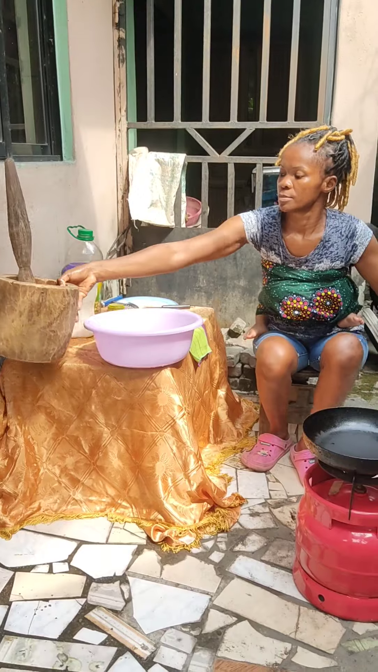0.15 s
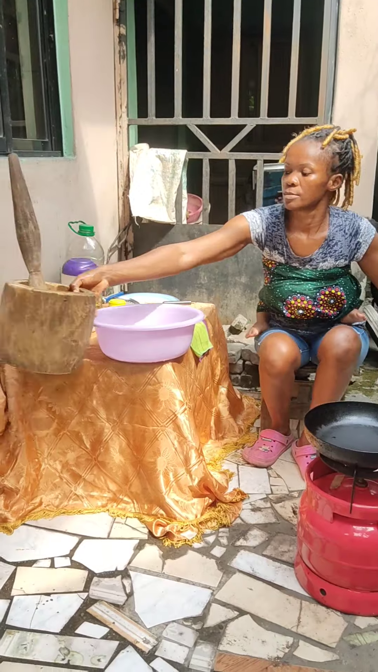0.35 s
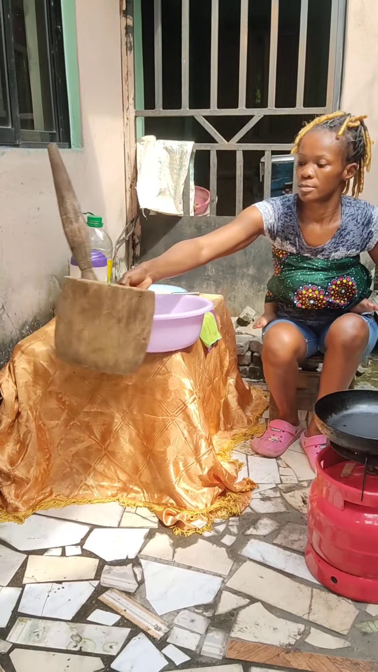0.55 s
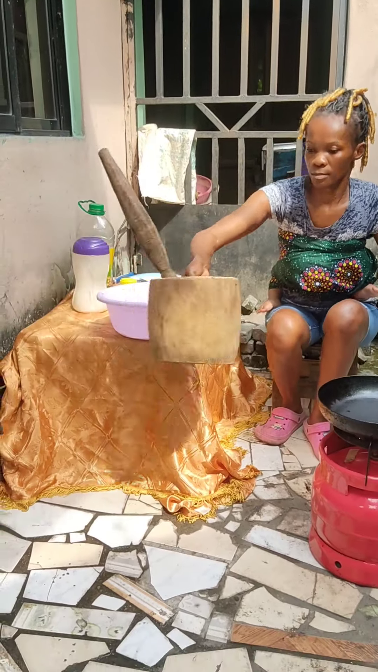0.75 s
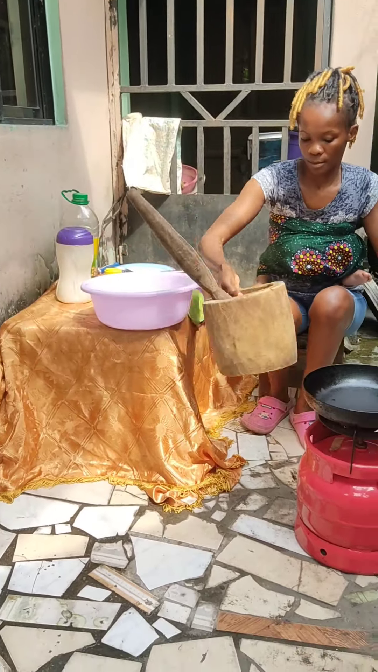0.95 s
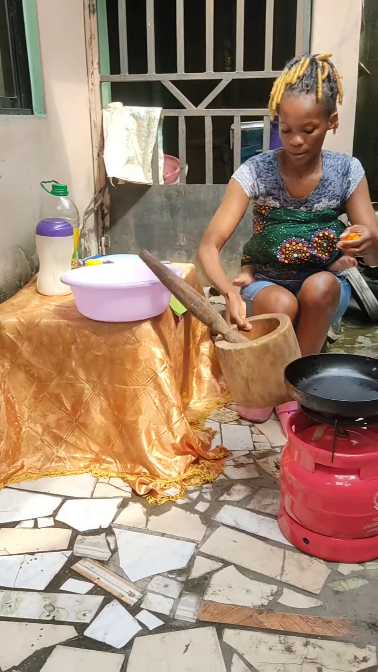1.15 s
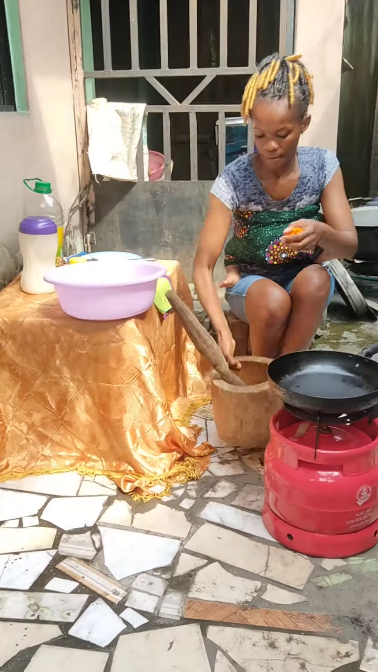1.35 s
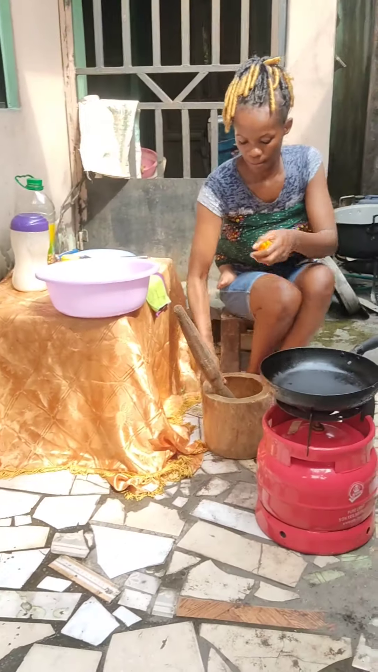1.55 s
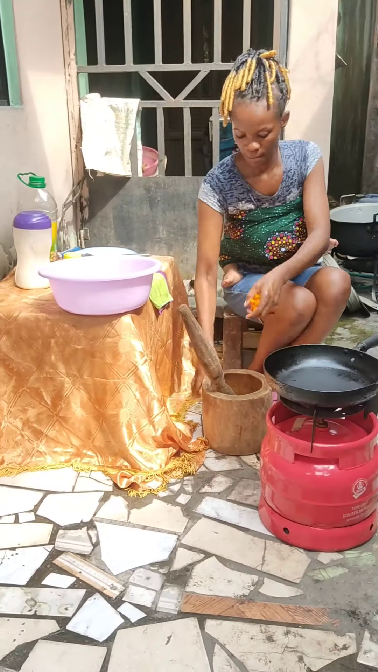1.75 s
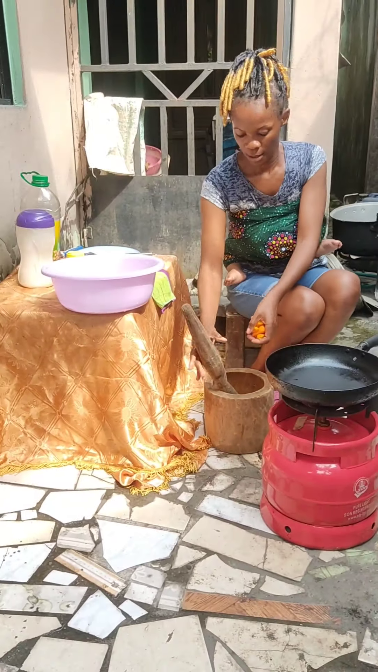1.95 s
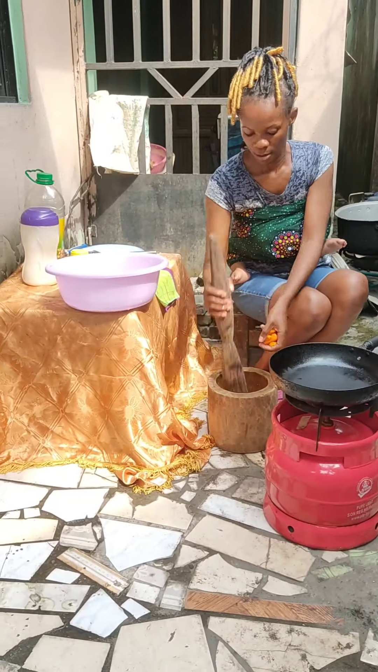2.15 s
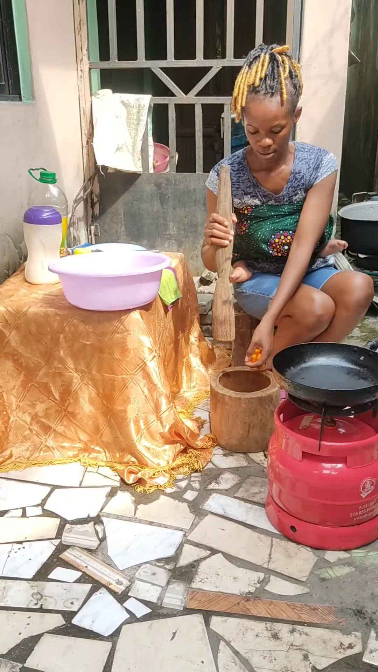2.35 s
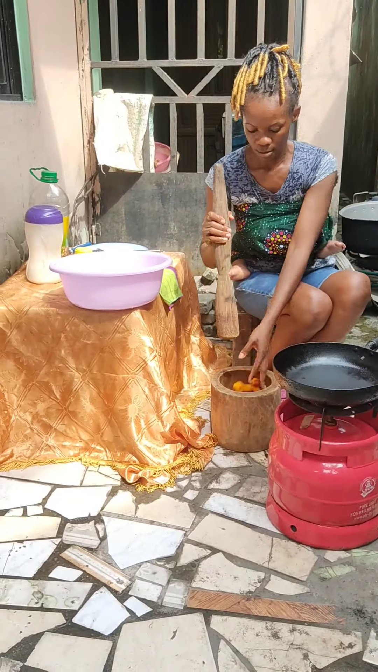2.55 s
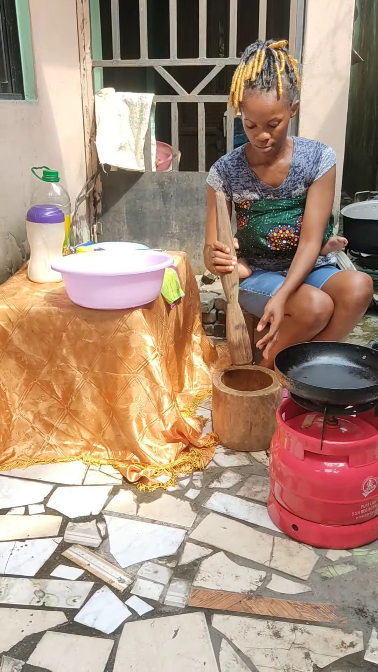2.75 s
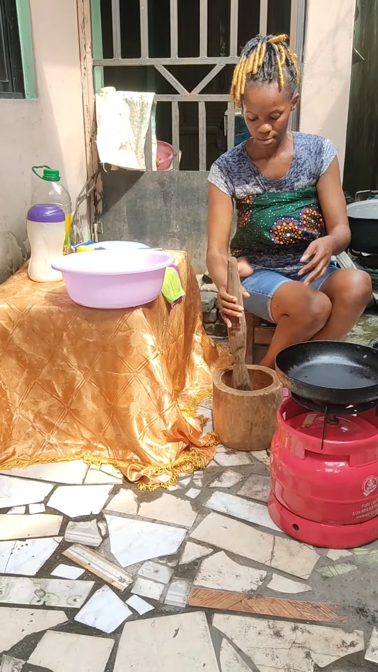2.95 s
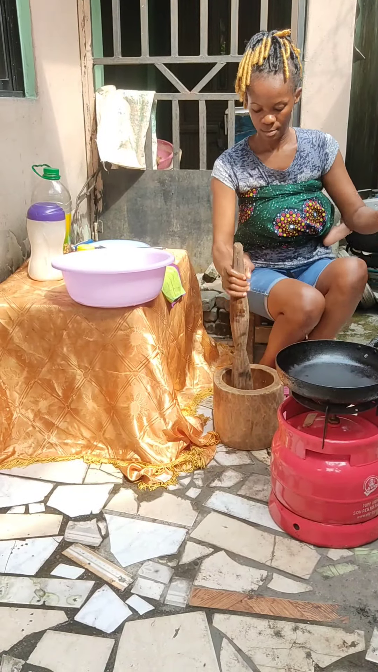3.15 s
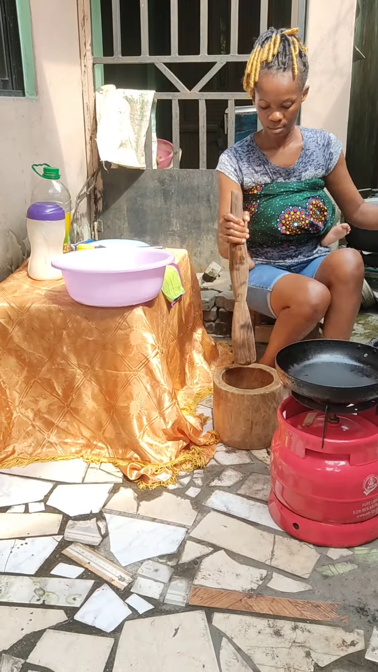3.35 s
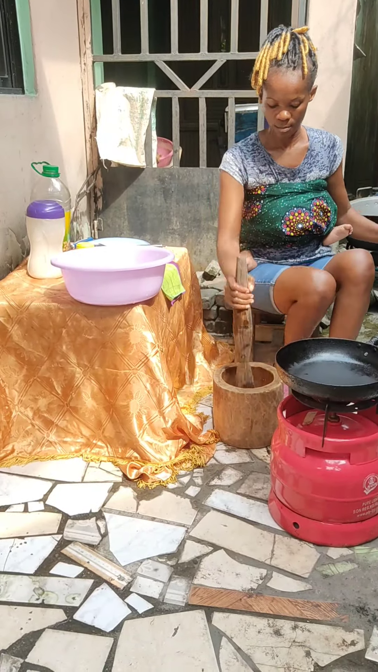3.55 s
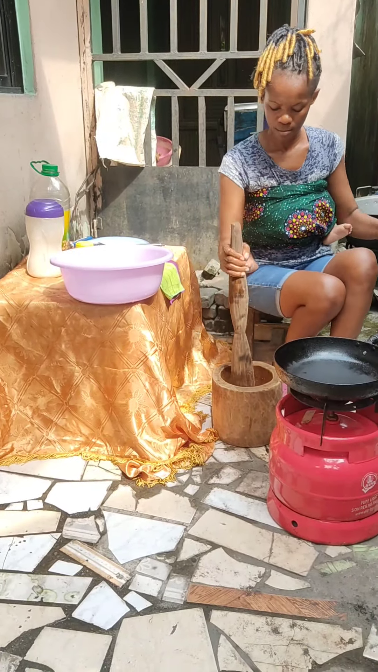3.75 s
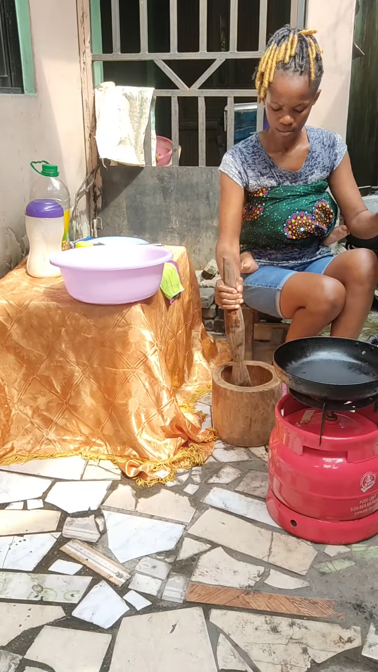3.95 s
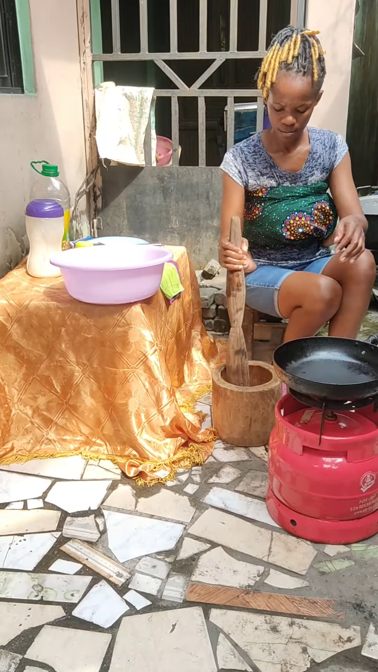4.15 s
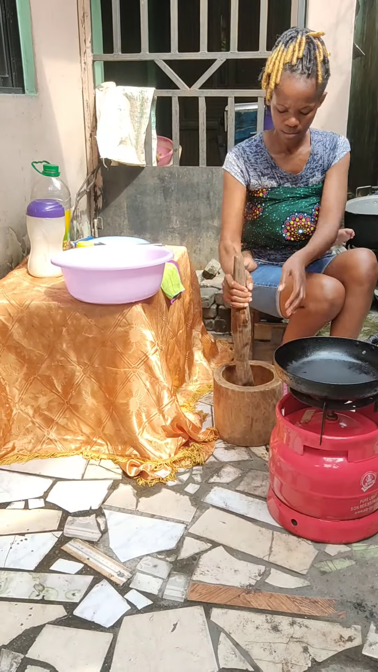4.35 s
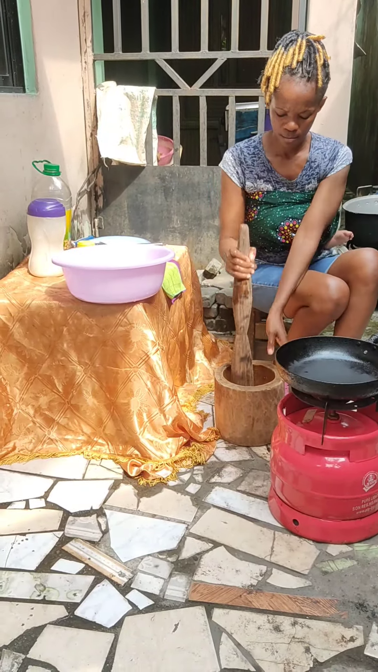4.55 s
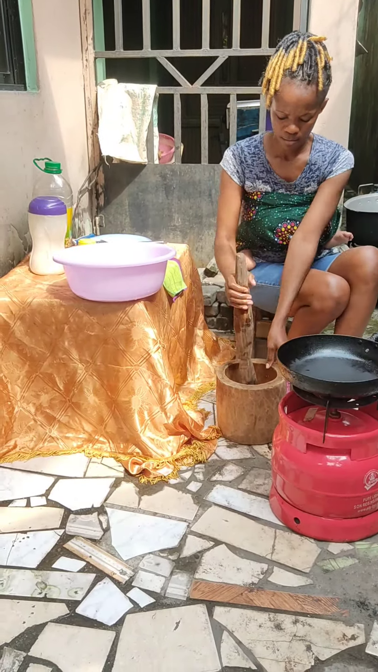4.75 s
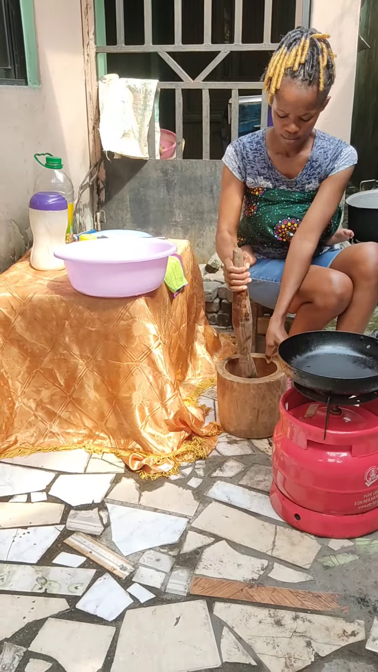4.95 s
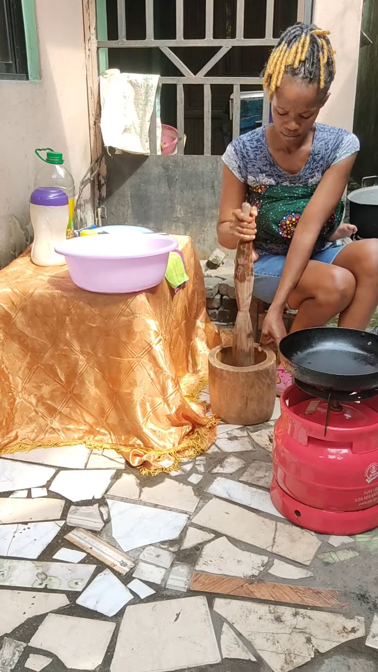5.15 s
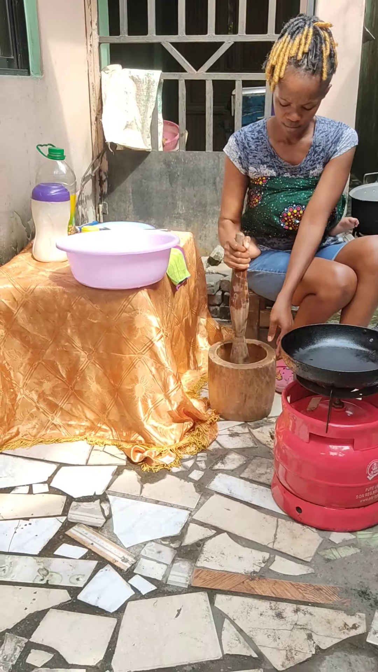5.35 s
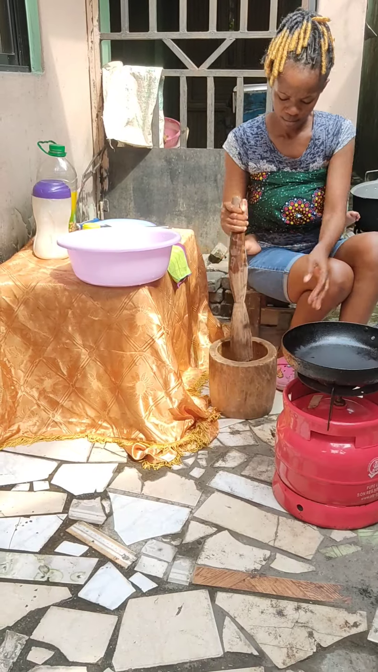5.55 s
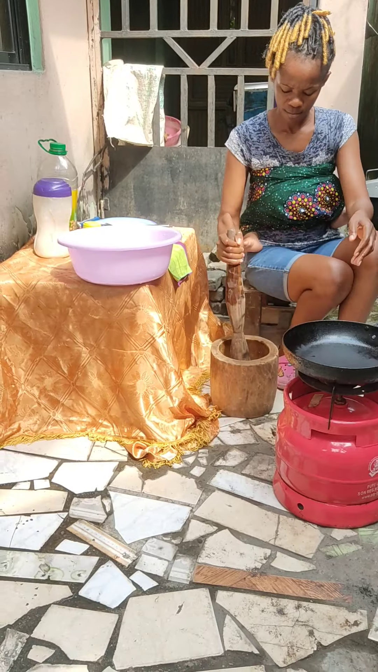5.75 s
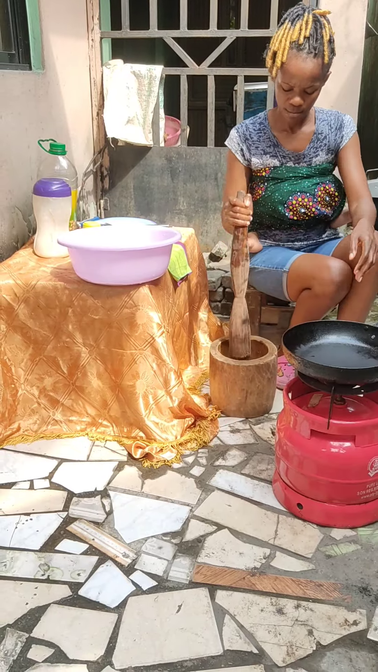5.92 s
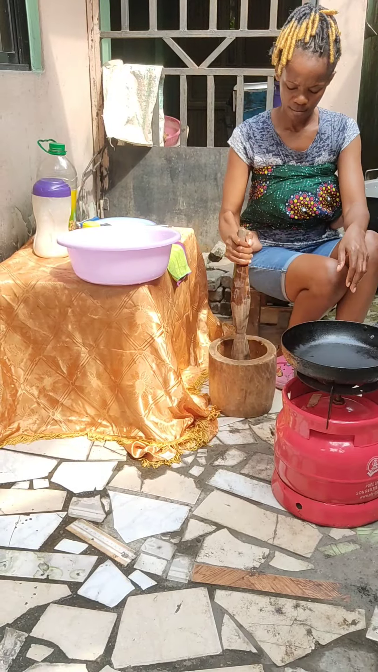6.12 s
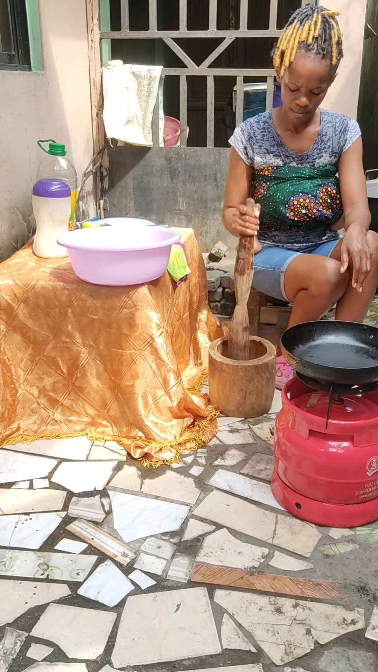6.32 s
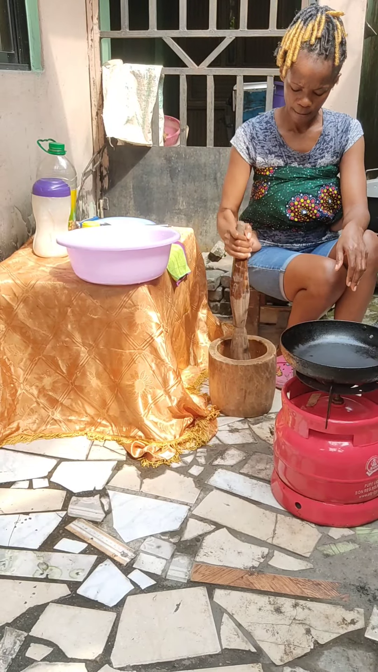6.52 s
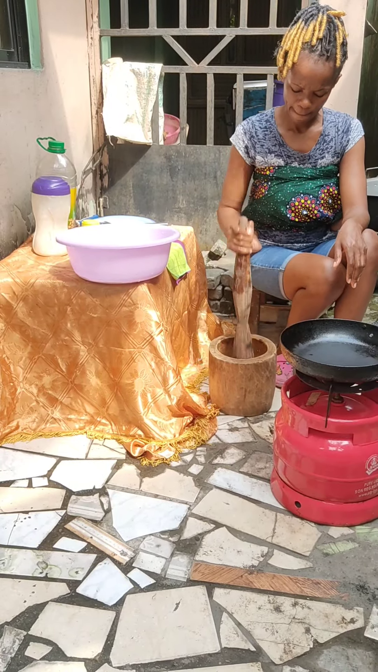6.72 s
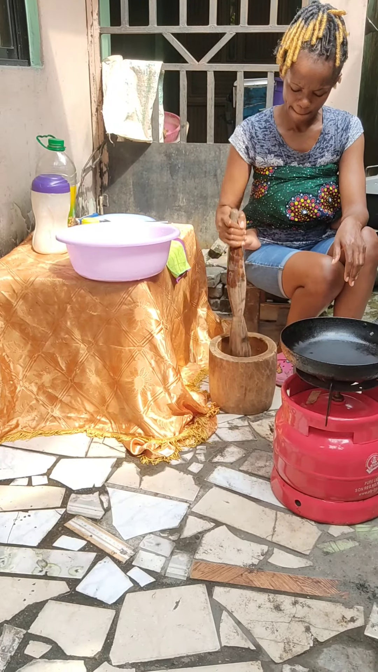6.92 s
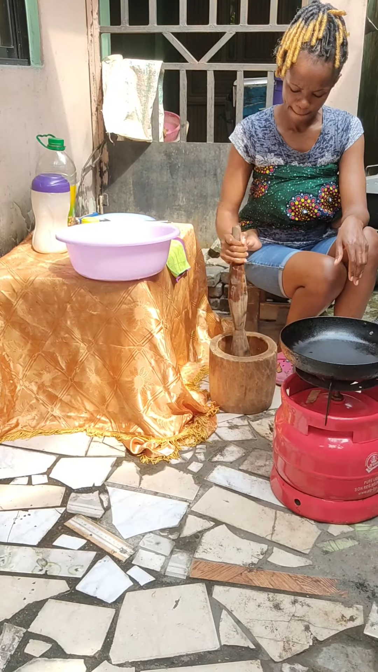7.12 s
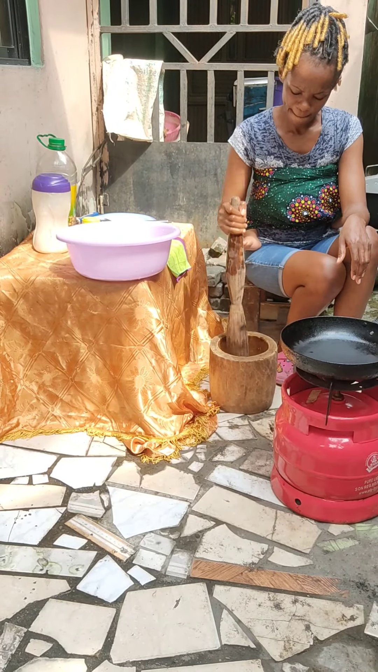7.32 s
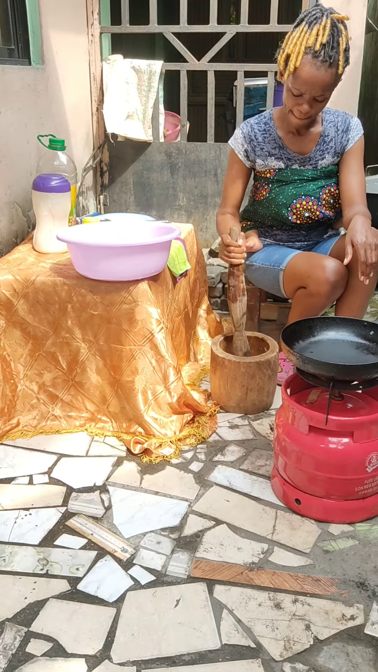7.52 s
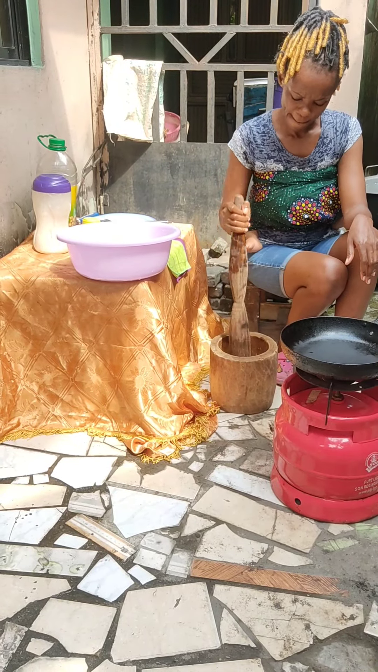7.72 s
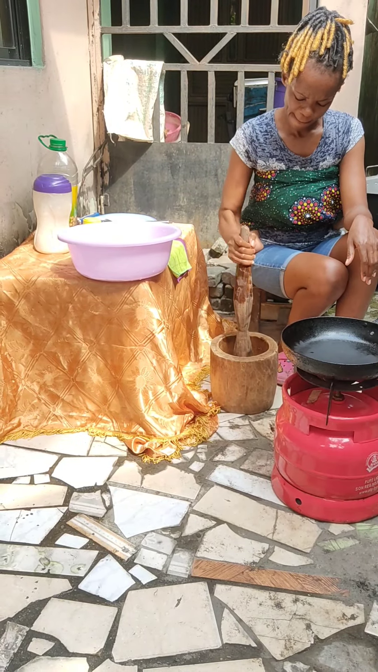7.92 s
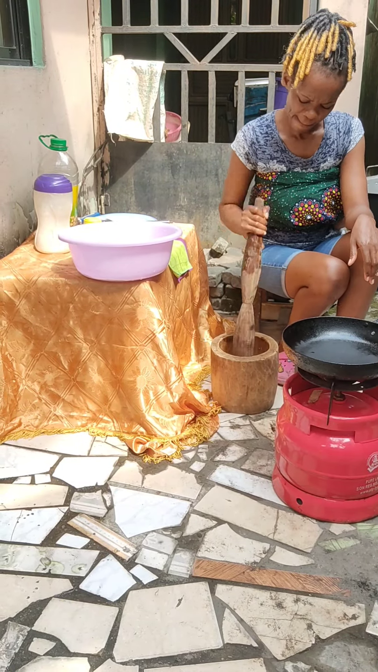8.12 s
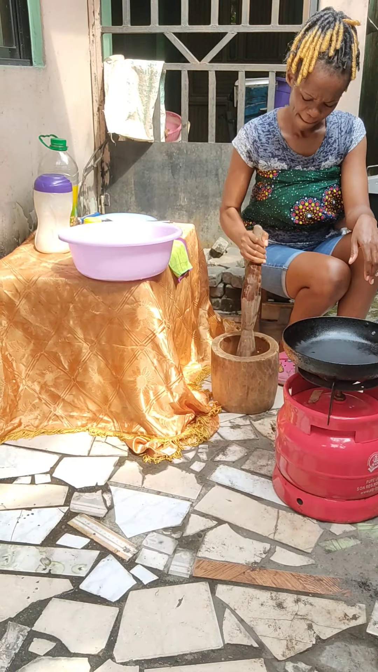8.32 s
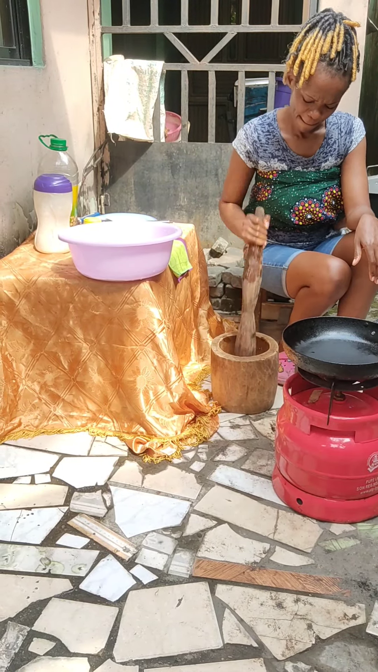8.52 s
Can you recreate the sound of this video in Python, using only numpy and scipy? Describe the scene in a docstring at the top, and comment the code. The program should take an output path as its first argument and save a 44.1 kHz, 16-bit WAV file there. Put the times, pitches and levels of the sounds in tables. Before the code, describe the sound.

A stereo outdoor take from a short distance: quiet breeze rumble and far noise, soft shuffling and dry ticks, then a solid wooden knock as the mortar is set down. Sparse soft taps and a rustle lead into regular pestle blows, deep and woody, each with a brief gritty squash of peppers. Some ring more hollowly, others are duller. Close hard walls add a short, tight echo; the pounding never stops.

```python
"""A breeze rumbles throughout on two microphone ports over far outdoor noise, with rustling cloth and feet,
while a pestle pounds peppers in a wooden mortar on the paving of a walled yard.
Each blow is a jittery force that rings the mortar's modes, plus a crunch of random clicks from the peppers.
Rustles are dense friction clicks, ticks are short resonant bursts, and three faint chirps glide upward.
Delays and fading noise echoes place all but the wind and far noise in the yard."""
import sys
import numpy as np
from scipy import signal
from scipy.fft import rfft, irfft, next_fast_len
from scipy.io import wavfile
from scipy.ndimage import uniform_filter1d

SR = 44100
rng = np.random.default_rng(int(sys.argv[2]) if len(sys.argv) > 2 else 0)


def inscribe(sig):
    """Save sig as 16-bit PCM at rate SR to the path in sys.argv[1].

    A 1-D sig is mono; a 2-D sig holds one channel per row.
    Samples are clipped to [-1, 1] before scaling.
    """
    pcm = np.round(np.clip(np.atleast_2d(sig).T, -1, 1) * 32767)
    wavfile.write(sys.argv[1], SR, pcm.astype(np.int16))


N = 378378  # length of the scene [samples]

# In all tables t60 is the time to fade by 60 dB. Levels are those of each layer before later stages.
# Wind strength over time: (time [s], level [dB])
WIND_LEVEL = [(0.0, -64), (0.33, -56), (0.5, -50.5), (0.95, -58.5), (1.46, -56), (1.98, -46.5), (2.24, -59),
              (3.15, -65), (3.34, -68), (3.61, -56.5), (4.11, -56), (4.42, -46.5), (5.14, -47),
              (5.54, -51.5), (5.78, -52.5), (6.57, -48), (6.81, -48.5), (7.53, -48.5), (7.84, -50.5),
              (8.58, -44)]
# Tone of the wind: (frequency [Hz], level [dB per Hz])
WIND_TONE = [(15, -2.5), (30, 1), (45, -12.5), (65, -12), (100, -26), (160, -19), (400, -63)]
# Tone of the far outdoor noise: (frequency [Hz], level [dB per Hz])
FAR_TONE = [(35, -3.5), (60, 5), (90, -5), (125, -14), (196, -3.5), (400, -7.5), (953, -18.5), (1600, -25),
            (2780, -23.5), (3760, -31.5), (6000, -29.5), (15500, -44.5)]
# How alike left and right are in diffuse sound: (frequency [Hz], likeness [-1 to 1])
STEREO_LIKENESS = [(30, .95), (130, .97), (200, .9), (290, .2), (640, -.2), (1400, .1), (4000, 0)]
# Faint far chirps, perhaps a bird: (time of loudest point [s], level [dB])
CHIRP_TIMES = [(6.11, -55), (6.183, -56), (6.26, -58)]
# Movements of cloth, feet and hands; swells and fades under 5 ms count as 5 ms:
# (time of loudest point [s], level [dB], swell by 20 dB [s], fade by 20 dB [s], dull share [0 to 1])
MOVEMENTS = [(.01, -51, 13, -1.1, .3), (0.32, -52.5, -0.18, 0.22, 0.06), (.41, -50, 0.54, 0.26, 0.34),
             (.749, -53, 0.3, 0.58, 0.95), (.914, -53, 0.12, 0, 0.11), (1.025, -47.5, 0.14, 0.05, 0.05),
             (1.2, -47, 0.1, 0.04, 0.09), (1.299, -52.5, .37, .5, 0.14), (1.428, -47, 0.1, 0.14, 0.74),
             (1.598, -46, -0.05, 0.15, 0.46), (1.66, -54.5, 0.07, 0.32, .6), (1.9, -55, -0.7, 0.1, 0.27),
             (2.135, -63, 0.17, 0.3, 0.93), (2.53, -55, 0.14, 0.4, 0.8), (2.7, -58, -0.03, 0, 0.5),
             (3.026, -53, 0.3, -0.02, 0.14), (3.095, -43, 0.16, 0.09, 0.03), (3.226, -44.5, 0.03, 0.29, 0),
             (3.257, -46, 0.07, 0.28, 0.4), (3.3, -64, 0.4, 1.3, 1), (4.92, -57.5, 1, 0.2, 0.37),
             (5.025, -46, 0.2, .2, 0.36), (5.085, -51, 0.16, 0.33, 0.6), (7.345, -57, 0.07, -0.4, 0.04)]
# Tone of the friction: (frequency [Hz], level [dB per Hz])
FRICTION_TONE = [(200, -30), (400, -10.5), (700, -7.5), (1000, -4), (1600, -7.5), (2200, -6.5), (3500, -7),
                 (6000, -4.5), (15500, -7)]
# Small dry ticks and scuffs: (time [s], level of the loudest 12 ms [dB], pitch [Hz], burst t60 [s])
TICK_EVENTS = [(0.225, -56, 8000, 0.027), (0.6674, -41.5, 8800, 0.04), (0.732, -47.5, 2700, 0.19),
               (1.4372, -31.5, 3620, 0.017), (1.439, -43, 5030, 0.048), (1.601, -45, 8900, 0.03),
               (1.765, -50.5, 8200, 0.024), (2.05, -49, 990, 0.03), (2.075, -58, 1800, 0.02),
               (2.114, -51, 1480, 0.03), (2.294, -54, 2600, 0.017), (3.442, -67, 1900, 0.025)]
# Contacts with the mortar; out-of-range crunch settings are limited in crunch_envelope():
# (time [s], paving boom [dB], ground thud [dB], lower wall ring [dB], upper wall ring [dB], rim ring [dB],
#  lower wall detuning [%], dead knock over ring [dB], judder [s], crunch [dB], crunch peak after contact [s],
#  crunch swell by 20 dB [s], crunch t60 [s], crunch tilt [dB per octave], lead hiss relative to crunch [dB],
#  left over right [dB])
CONTACTS = [(0.992, -82, -63, -68, -68, -45.5, 1.5, 17, 0.021, -50.5, 0.033, 1, .16, 0, -20, -1),
            (1.411, -62, -57, -51, -52, -41, -2, 8, 0.0026, -48, 0.0034, .01, .1, 1, -20, -2),
            (1.440, -34, -21, -17, -14, -16, 0.5, 3, 0.0043, -30.5, .002, -2.3, .04, -6, -12.5, -2.5),
            (1.511, -62, -35.5, -50, -38, -55, -1, -5, 0.0064, -68, 0.028, -0.5, .09, 0, -20, -1),
            (1.938, -52, -40.5, -44.5, -56, -54, -4.5, -2, 0.0046, -66, .004, 7, .1, 0, -20, 1.5),
            (2.497, -52, -50.5, -38.5, -46, -43, -2, -2, .022, -56, 0.035, -2, 0.13, -7, -16, 3),
            (2.869, -36, -29, -36.5, -48, -47, -0.5, 2.5, 0.011, -32.5, 0.0077, 1, 0.12, 1, -37, 0.5),
            (3.299, -65, -48, -52, -55, -48.5, -2, 10, .0058, -54, 0.0023, 2, .1, -11.5, -20, 2),
            (3.436, -69.5, -82, -59, -65, -37, 0, 2, 0.0099, -43, 0.011, 2, 0.28, -4.5, -30, -2),
            (3.466, -29.5, -29, -32.5, -28, -42, 0, 5.5, 0.011, -22.5, 0.01, 0.6, 0.17, -3, -30, 0.5),
            (3.846, -32, -16.5, -20, -20.5, -24.5, -1, 1.5, 0.0076, -24.5, 0.0049, 0.7, 0.13, -3.5, -27, 0.5),
            (4.204, -28, -17, -17.5, -18.5, -23, 0, 1, 0.0069, -23, 0.0057, -0.2, 0.13, -4, -14, 0),
            (4.545, -47.5, -32, -29, -36, -48, 7, -2, 0.0021, -47.5, 0, -2, .08, -6, -15, 0),
            (4.557, -39, -21, -15, -13.5, -18, 0.5, -1, 0.0084, -18, 0.0087, 0.7, 0.088, -5, -26, -4.5),
            (4.644, -54, -39, -38, -30.5, -52, -1.5, -12, 0.0071, -50, .005, 7, .1, -5, -20, -1),
            (4.996, -54, -37, -40.5, -64, -45.5, -0.5, -2, 0.007, -51.5, 0, -2, .1, -6, -20, 0),
            (5.08, -48, -32, -38, -51, -44, -5.5, 4, 0.0062, -62, .005, .01, .1, -8, -20.5, 0),
            (5.215, -33, -16, -19, -20.5, -29.5, -1.5, 1.5, 0.0096, -19, 0.018, -3, 0.082, -2.5, -16, 0.5),
            (5.584, -30, -18.5, -17.5, -21.5, -26.5, -5, 0, 0.0084, -42, 0.0029, -0.2, 0.17, -4.5, -20, 0),
            (5.610, -31, -15, -24.5, -40, -22.5, 0, 2, 0.0051, -22, 0, 0.5, 0.066, -3, -21, 0.5),
            (5.957, -26.5, -21, -44, -42, -42, 1.5, 1, 0.0056, -23, 0.0034, .016, 0.051, -1, -15, 0),
            (6.308, -29, -18, -12, -13, -18.5, 0.5, -3, 0.013, -24.5, 0.015, -0.3, 0.054, 0.5, -27, -4.5),
            (6.679, -23.5, -17.5, -34.5, -44, -41, 0, 3.5, 0.0038, -24.5, 0.0014, 0.1, 0.076, -1, -32, 0),
            (7.033, -25, -20.5, -31, -35, -46, 0.5, 3, 0.0078, -17.5, 0.0063, 0.2, 0.051, -1.5, -13.5, -0.5),
            (7.402, -25.5, -15, -17, -20.5, -30.5, -0.5, 5.5, 0.0086, -24.5, 0.0093, 0.1, 0.067, 0.5, -12, 0),
            (7.751, -23, -15.5, -15.5, -27.5, -26.5, -4.5, 2, .006, -23, 0.0086, 3.5, .11, -2, -14.5, 0.5),
            (8.110, -28, -16, -11, -11, -27.5, 0, -0.5, 0.0057, -30, 0.0065, -0.15, 0.12, -2.5, -28, -4),
            (8.165, -39.5, -24.5, -29, -35.5, -59, -0.5, -10, 0.004, -51, 0, .01, .1, -1, -20, -3.5),
            (8.475, -27.5, -16, -13.5, -15, -25, -2, 3, 0.009, -26.5, .009, -4, 0.11, -1.5, -14, -3)]
# Tone of the crunch before each contact's tilt: (frequency [Hz], level [dB per Hz])
CRUNCH_TONE = [(400, -8.5), (800, -11), (1500, -4), (2100, -6), (2800, -0.5), (3500, -6), (6000, -3.5),
               (10000, -6), (15500, -7)]
# Ringing modes of the mortar on the paving: (frequency [Hz], level within its zone [dB], t60 [s])
MORTAR_MODES = [(71.6, 4, 0.34), (107.9, 0.5, 0.23), (163.6, -7.5, 0.23), (186.4, -10, 0.14),
                (204.3, 5.5, .17), (240, -2, 0.14), (279, -1.5, .14), (311.3, 3.5, 0.16), (373.5, -9, 0.31),
                (429.5, -8, 0.1), (478, -3, 0.087), (507.5, 6, 0.17), (546.7, 4, .13), (607, -0.5, .12),
                (652, -9, 0.13), (764, 1, .057), (957, 6, 0.088), (987, -9, 0.14), (933, 9.5, .036),
                (1316, -1.5, 0.069), (1500, -9.5, 0.046), (1948, -10.5, 0.046)]
# Upper ends of the boom, thud, lower wall, upper wall and rim zones: (frequency [Hz])
ZONE_TOPS = [130, 340, 528, 720, 2400]
# Echoes off the near walls and paving: (frequency [Hz], t60 [s], level [dB])
YARD_ECHOES = [(60, .25, -6), (250, .24, -1), (1000, .22, -1), (4000, .17, -1), (12000, .13, -1)]
# Delay of direct sound at the left port, as bass bends round the body: (frequency [Hz], delay [s])
LEFT_DELAY = [(300, 0.00016), (550, 0.00025), (1000, 0.000064), (1700, 0.00045), (9000, 0.0003897)]
# The microphones' body shades one port: (frequency [Hz], left over right [dB])
BODY_SHADOW = [(60, 5.5), (150, 4.5), (380, 10.5), (700, 0.5), (1290, 6), (2380, 3), (4400, 0),
               (8120, -3.5), (15000, 4)]
# Port resonance and roll-off: (frequency [Hz], level [dB])
PORT_TONE = [(5500, 3), (7000, 5), (8100, 11.5), (9300, 10), (10400, -5), (12500, -6.5), (15500, -31)]

FAR_DB = -56.5
CHIRP_HZ, CHIRP_RISE_HZ_PER_S = 2830, 2500  # pitch at the loudest point, and its rise
CHIRP_FADE_S = 0.067  # to swell or fade by 20 dB
DULL_HZ = 3130  # heavy rubbing stays mostly below this
MODE_SCATTER_DB, MODE_SHIFT = 3, 0.015  # chance spread at each contact [dB, share of pitch]
ROCK_DB, ROCK_T60_S = -13, 0.39  # the mortar rocks after the blow and keeps feeding its modes
LEAD_S = 0.03  # a faint hiss leads each crunch by up to this long
SLOWEST_SWELL_S = .022  # longest allowed crunch swell by 20 dB
BURST_DB, BURST_S = -4.5, 0.0058  # skins burst together at the peak of the crunch
CRUNCH_LUMPS_DB = 2.0  # peppers burst unevenly
WOOD_DIRECT_DB, WOOD_ECHO_DB = -3.5, -3  # knocks carry mostly straight
GRIT_DIRECT_DB, GRIT_ECHO_DB = -5.5, 0.74  # crunch, ticks, rustle and chirps scatter more
FIRST_ECHO_S = 0.0012  # echoes start here and are fully in at twice this
FAR_WALLS_DB, FAR_WALLS_LONGER = -15, 2.16  # far walls: start level against near walls, times the t60
MIC_LOW_HZ, CUTOFF_HZ = 22.3, 15770  # the ends of the range that is kept
OVERLOAD = 1.1  # peaks are rounded off towards this


def amp(db):
    """Turn decibels into a plain multiplier."""
    return 10 ** (np.asarray(db) / 20)


def rms_one(x):
    """Scale a sound to an average (rms) strength of 1."""
    return x / np.sqrt(np.mean(x ** 2) + 1e-30)


def loudest_one(x):
    """Scale a sound so its loudest 12 ms has rms 1."""
    return x / np.sqrt(uniform_filter1d(x ** 2, size=512).max())


def in_time(rows):
    """Draw a (time, value) curve at every sample."""
    s, value = np.transpose(rows)
    return np.interp(np.arange(N) / SR, s, value)


def at_hz(points, hz):
    """Read a (frequency, value) curve, with straight lines on a log frequency scale."""
    p = np.array(points, float)
    return np.interp(np.log(np.maximum(hz, 1)), np.log(p[:, 0]), p[:, 1])


def drift(rate_hz):
    """Slow random wandering of spread 1: noise smoothed twice, made at every 40th sample."""
    r = np.exp(-80 * np.pi * rate_hz / SR)
    noise = rng.standard_normal(N // 40 + 2002)
    slow = signal.lfilter([1], [1, -2 * r, r * r], noise)[2000:]  # drop the start-up
    slow = rms_one(slow - slow.mean())
    return np.interp(np.arange(N) / 40, np.arange(len(slow)), slow)


def coloured(x, spectrum):
    """Give a steady signal a tone by scaling its frequencies; rms 1."""
    hz = np.fft.rfftfreq(x.shape[-1], 1 / SR)
    return rms_one(irfft(rfft(x) * amp(at_hz(spectrum, hz)), x.shape[-1]))


def diffuse(spectrum, size):
    """Stereo noise from all around: alike in the bass, unrelated in the treble; rms 1."""
    mid, side = rfft(rng.standard_normal((2, size)))
    hz = np.fft.rfftfreq(size, 1 / SR)
    alike = np.clip(at_hz(STEREO_LIKENESS, hz), -1, 1)
    pair = np.sqrt(1 + alike) * mid + np.sqrt(1 - alike) * side * [[1], [-1]]
    return rms_one(irfft(pair * amp(at_hz(spectrum, hz)), size))


def grains(per_s, spread_db, size):
    """Random clicks of uneven size and either sign, like many tiny breaks."""
    excess_db = spread_db * np.minimum(rng.exponential(1, size), 5)
    sizes = amp(excess_db) * rng.choice([-1, 1], size)
    return sizes * (rng.random(size) < per_s / SR)


def swell(s, db, swell_s, fade_s):
    """A sound grows and dies away at steady rates in dB around its loudest moment."""
    t = np.arange(N) / SR
    rising = (s - t) / max(swell_s, .005)
    fading = (t - s) / max(fade_s, .005)
    return amp(np.maximum(db - 20 * np.where(t < s, rising, fading), -140))


def ring(force, hz, t60):
    """A force sets one mode ringing: a resonant filter whose answer to each push fades over t60."""
    r, w = amp(-60 / (t60 * SR)), 2 * np.pi * hz / SR
    return loudest_one(signal.lfilter([1, 0, -1], [1, -2 * r * np.cos(w), r * r], force))


def far_noise():
    """Steady far outdoor noise whose level wanders a little."""
    return amp(FAR_DB + 1.56 * drift(7.5)) * diffuse(FAR_TONE, size=N)


def breeze():
    """Air moving over the ports rumbles as deep noise that follows the gusts."""
    gusts_db = in_time(WIND_LEVEL) + 2.0 * drift(7.6)
    return amp(gusts_db) * diffuse(WIND_TONE, size=N)


def whistle():
    """A breathy narrow band, a tone times slow noise, glides upward in each short chirp."""
    t, breath = np.arange(N) / SR, drift(200)
    out = 0
    for s, db in CHIRP_TIMES:
        past = t - s
        tone = np.sin(2 * np.pi * (CHIRP_HZ + CHIRP_RISE_HZ_PER_S * past / 2) * past)
        out = out + swell(s, db, CHIRP_FADE_S, CHIRP_FADE_S) * breath * tone
    return out


def rustle():
    """Dense grains of friction come in patches; heavier rubbing is duller and coarser."""
    fine = coloured(grains(per_s=7000, spread_db=2.5, size=N), FRICTION_TONE)
    coarse = coloured(grains(per_s=1400, spread_db=1.0, size=N), FRICTION_TONE)
    keep_dull = signal.butter(4, DULL_HZ, fs=SR, output="sos")
    coarse = rms_one(signal.sosfilt(keep_dull, coarse)) * amp(1.6 * drift(21))
    out = 0
    for *shape, dull in MOVEMENTS:
        dull = np.clip(dull, 0, 1)
        friction = np.sqrt(1 - dull) * fine + np.sqrt(dull) * coarse
        out = out + swell(*shape) * friction
    return out * amp(1.66 * drift(27))


def ticks():
    """Each tick is a short burst of noise through one broad resonance."""
    out, size = np.zeros(N + SR), SR // 5
    t = np.arange(size) / SR
    for s, level_db, hz, t60 in TICK_EVENTS:
        burst = rng.standard_normal(size) * amp(-60 * t / max(t60, .003))
        at = round(s * SR)
        out[at:at + size] += amp(level_db) * ring(burst, hz, 12.0 / hz)
    return out[:N]


def struck(force, low_hz, top_hz, knock_db, detune):
    """A force rings every mode of one zone, with chance strength and tuning, over a dead knock."""
    modes = [m for m in MORTAR_MODES if low_hz <= m[0] < top_hz]
    edges = [modes[0][0] * 0.86, min(top_hz, 1300)]
    knock_band = signal.butter(2, edges, "band", fs=SR, output="sos")
    knock = loudest_one(signal.sosfilt(knock_band, force))
    # a soft contact feeds little above the zone
    soft = signal.sosfilt(signal.butter(2, 0.57 * top_hz, fs=SR, output="sos"), force)
    luck = rng.standard_normal((len(modes), 2))
    rings = 0
    for (hz, level_db, t60), (a, b) in zip(modes, luck):
        tuned_hz = hz * (1 + detune / 100 + MODE_SHIFT * b)
        rings = rings + amp(level_db + MODE_SCATTER_DB * a) * ring(soft, tuned_hz, t60)
    return loudest_one(loudest_one(rings) + amp(knock_db) * knock)


def blow_on_wood(t, levels, detune, knock_db, judder_s):
    """The pestle judders on the wood: a grainy force builds, lets go and rocks, ringing five zones."""
    after = np.maximum(t, 0)
    judder = max(judder_s, .001)
    grip = after / judder * np.exp(1 - after / judder)
    rock = amp(ROCK_DB - 60 * after / ROCK_T60_S) * np.minimum(after / judder, 1)
    force = (grip + rock) * grains(per_s=3700, spread_db=2.0, size=len(t)) + 1e-18
    detunes = 0, 0, detune, 0, 0  # only the lower wall
    zones = zip(levels, [0] + list(ZONE_TOPS), ZONE_TOPS, detunes)
    return sum(amp(level) * struck(force, low, top, knock_db, off) for level, low, top, off in zones)


def crunch_envelope(t, peak_s, swell_s, crunch_t60, hiss_db):
    """A faint hiss leads, then the crunch swells to a burst and crackles out."""
    ahead, past = np.maximum(peak_s - t, 0), np.maximum(t - peak_s, 0)
    lead_in = np.clip(2.8 * (1 - ahead / LEAD_S), 0, 1)
    rise = amp(-20 * ahead / np.clip(swell_s, .003, SLOWEST_SWELL_S))
    hiss = amp(min(hiss_db, -4))  # a floor under the rise
    fade = amp(-60 * past / max(crunch_t60, .02))
    burst = amp(BURST_DB) * np.exp(-((t - peak_s) / max(BURST_S, .002)) ** 2)
    return np.maximum(rise, hiss) * lead_in * fade + burst


def pounding():
    """Each contact knocks the wood and crunches the peppers; gives wood and crunch, both in stereo."""
    out, lead, size = np.zeros((2, 2, N + SR)), SR // 10, SR // 2
    t = (np.arange(size) - lead) / SR  # contact at 0
    lumps = amp(CRUNCH_LUMPS_DB * drift(100))
    for (s, *levels, detune, knock_db, judder_s, crunch_db, peak_s, swell_s, crunch_t60,
         tilt, hiss_db, pan_db) in CONTACTS:
        at = round(s * SR) - lead
        wood = blow_on_wood(t, levels, detune, knock_db, judder_s)
        crackle = crunch_envelope(t, peak_s, swell_s, crunch_t60, hiss_db)
        colour = [(hz, level + tilt * np.log2(hz)) for hz, level in CRUNCH_TONE]
        grit = coloured(grains(per_s=20000, spread_db=1.5, size=size), colour)
        crunch = amp(crunch_db) * crackle * grit * np.resize(lumps[at:], size)
        pan = amp(pan_db * np.array([[.5], [-.5]]))
        out[..., at:at + size] += np.array([wood, crunch])[:, None] * pan
    return out[..., :N]


def yard(x, direct_db, echo_db):
    """Direct sound reaches the right port first; dense echoes off walls and paving die band by band."""
    size = SR // 2
    t = np.arange(size) / SR
    scatter = diffuse([(20, 0.014), (20000, 0.0093)], size=size)  # almost flat noise
    table, echoes = np.array(YARD_ECHOES), 0
    for low in 40 * 2. ** np.arange(9):  # octave bands
        edges = [low, min(2 * low, .45 * SR)]
        band = signal.sosfilt(signal.butter(2, edges, "band", fs=SR, output="sos"), scatter)
        middle = low * np.sqrt(2)
        t60, level_db = at_hz(table[:, :2], middle), at_hz(table[:, ::2], middle)
        near = amp(-60 * t / t60)
        far = amp(FAR_WALLS_DB - 60 * t / (FAR_WALLS_LONGER * t60))
        fade = (near + far) * np.clip(t / FIRST_ECHO_S - 1, 0, 1)
        echoes = echoes + amp(level_db + echo_db) * band * fade / np.sqrt(np.sum(fade ** 2))
    length = next_fast_len(N + size)
    hz = np.fft.rfftfreq(length, 1 / SR)
    # only the left port is delayed
    direct = amp(direct_db) * np.exp(-2j * np.pi * hz * at_hz(LEFT_DELAY, hz) * [[1], [0]])
    shade = amp(at_hz(BODY_SHADOW, hz) * [[.5], [-.5]])
    return irfft(rfft(x, length) * (direct + rfft(echoes, length)) * shade, length)[:, :N]


def scene():
    """Place wood and gritty sounds in the yard and add the wind and far noise."""
    background = far_noise() + breeze()
    wood, crunch = pounding()
    grit = whistle() + rustle() + ticks() + crunch
    wood_in_yard = yard(wood, WOOD_DIRECT_DB, WOOD_ECHO_DB)
    grit_in_yard = yard(grit, GRIT_DIRECT_DB, GRIT_ECHO_DB)
    return background + wood_in_yard + grit_in_yard


def record(dry):
    """The ports shape the treble, peaks are rounded, and the deepest bass and the top are cut."""
    x = irfft(rfft(dry) * amp(at_hz(PORT_TONE, np.fft.rfftfreq(N, 1 / SR))), N)
    x = signal.sosfilt(signal.butter(2, MIC_LOW_HZ, "high", fs=SR, output="sos"), x)
    x = OVERLOAD * np.tanh(x / OVERLOAD)
    return signal.sosfilt(signal.ellip(12, .5, 70, CUTOFF_HZ, fs=SR, output="sos"), x)


dry = scene()
out = record(dry)
inscribe(out)
```